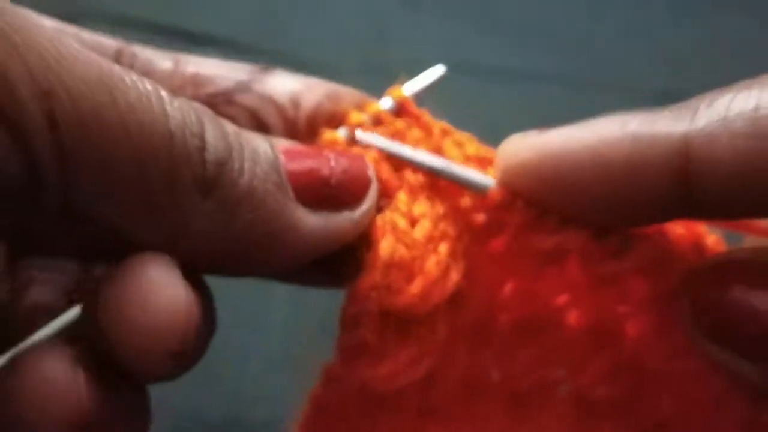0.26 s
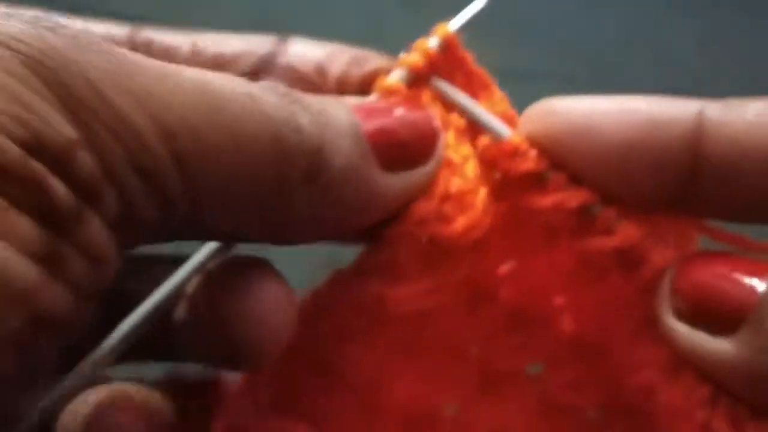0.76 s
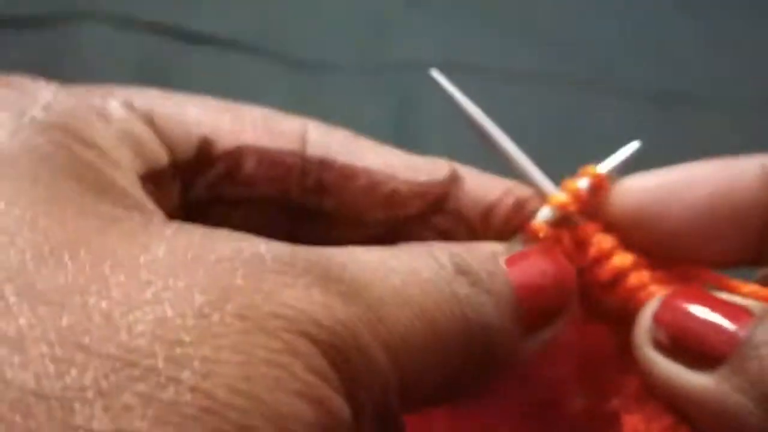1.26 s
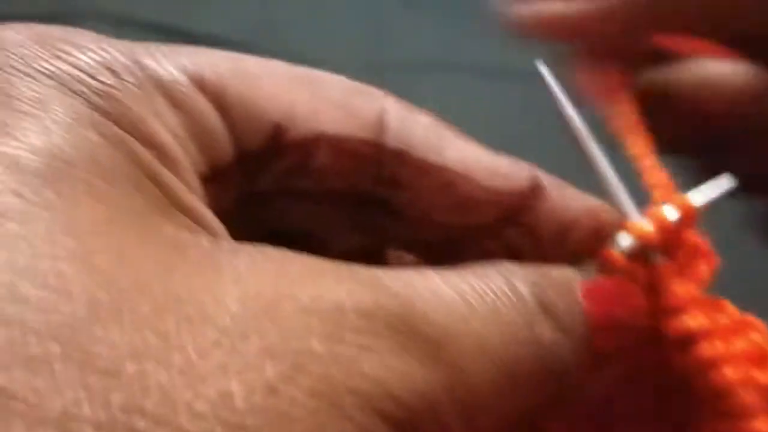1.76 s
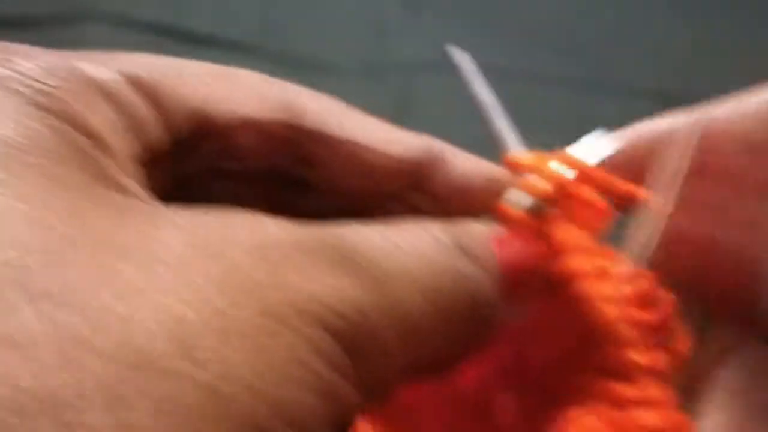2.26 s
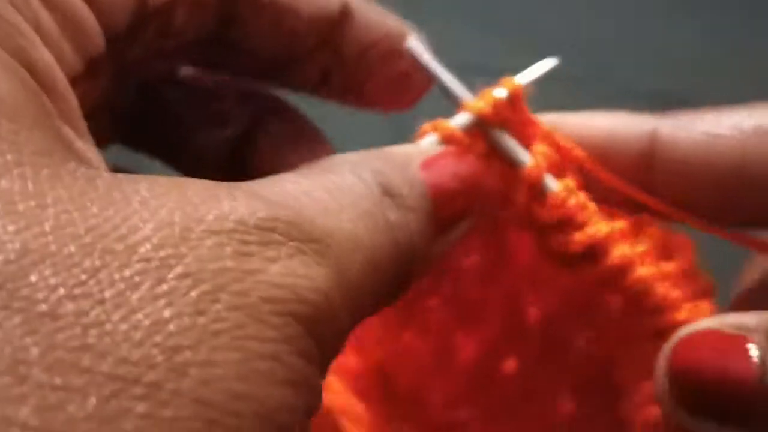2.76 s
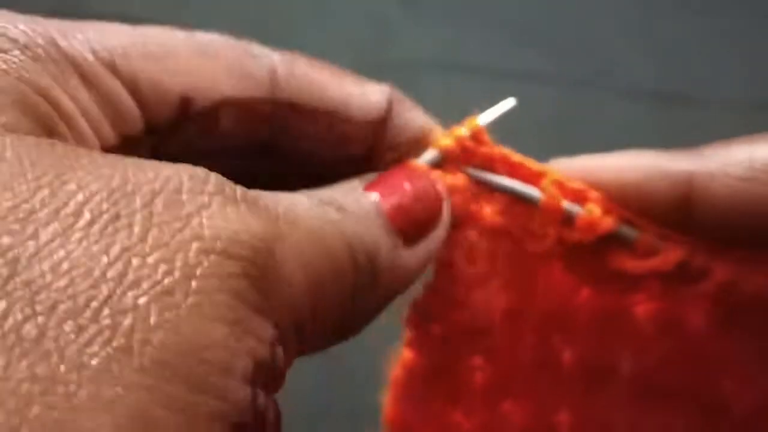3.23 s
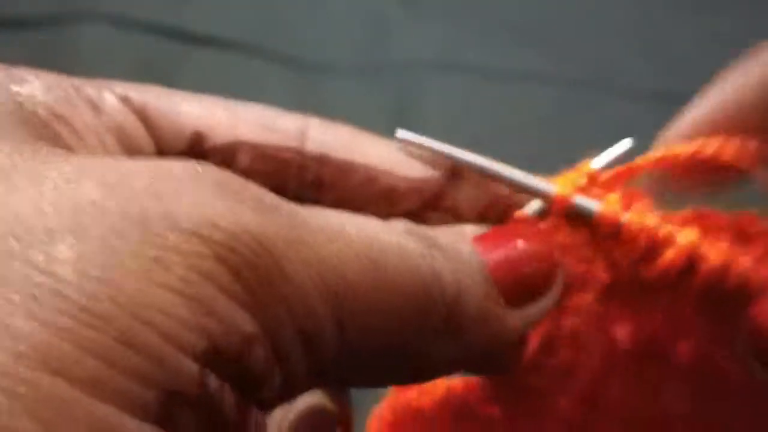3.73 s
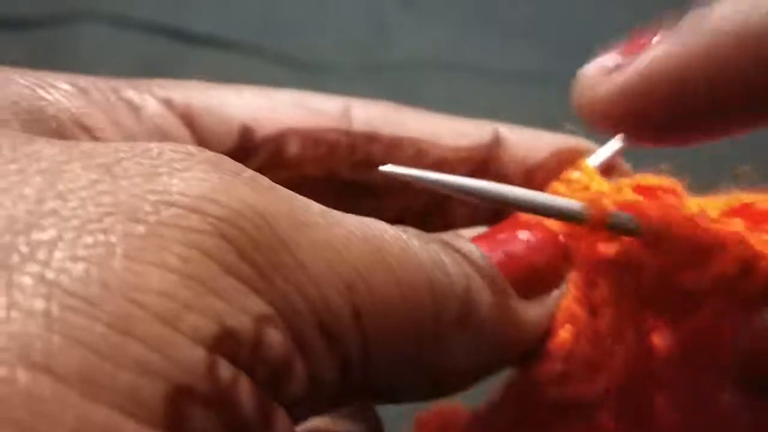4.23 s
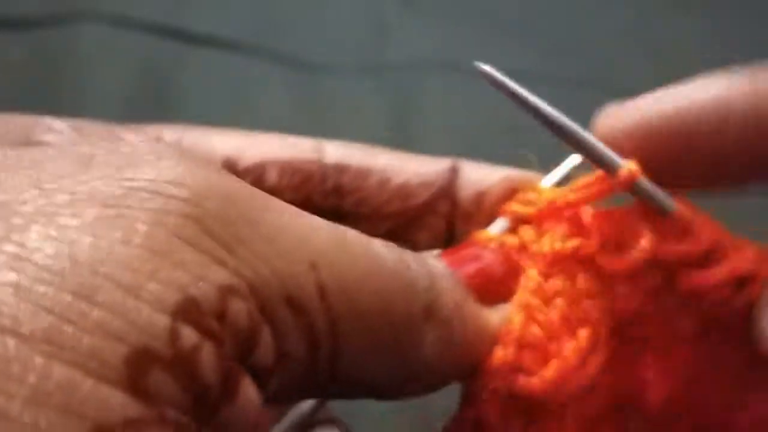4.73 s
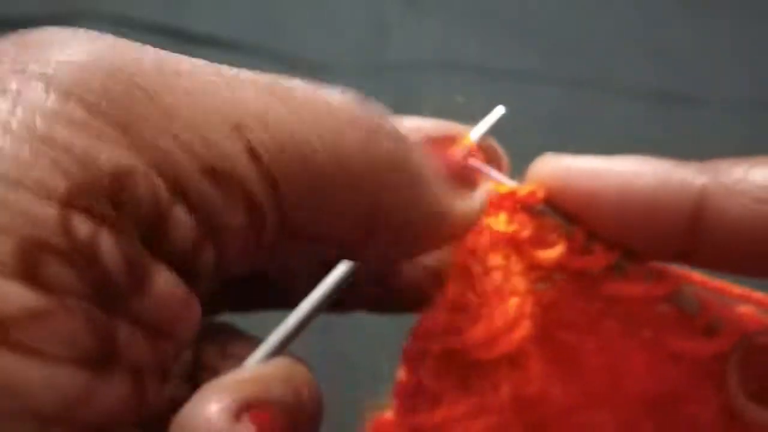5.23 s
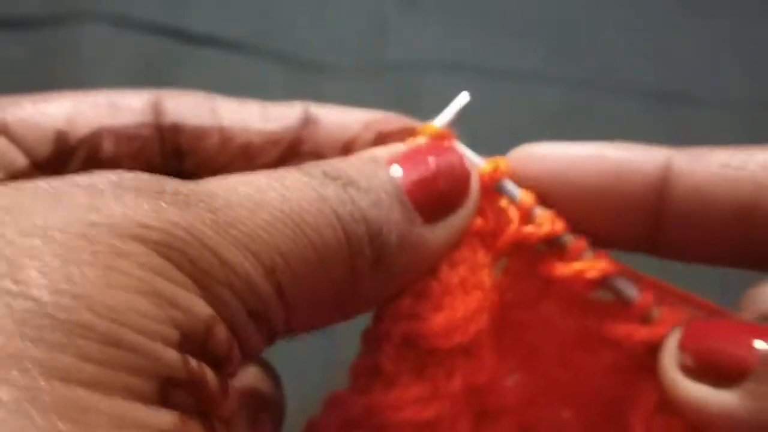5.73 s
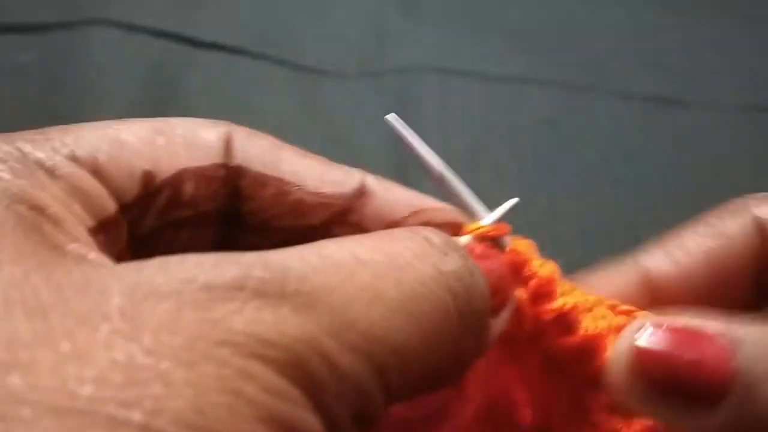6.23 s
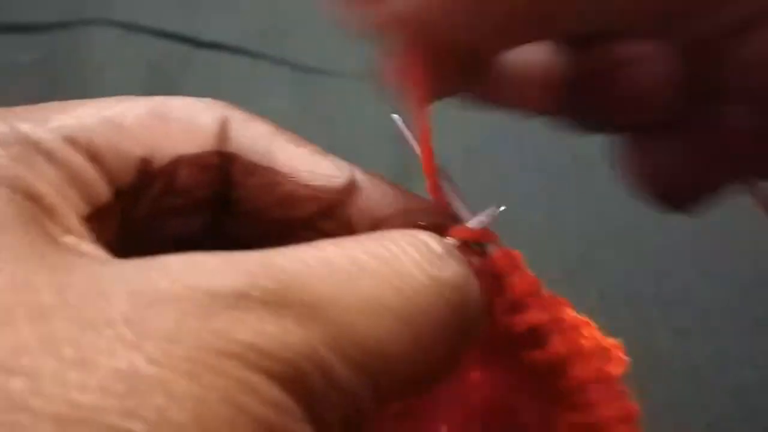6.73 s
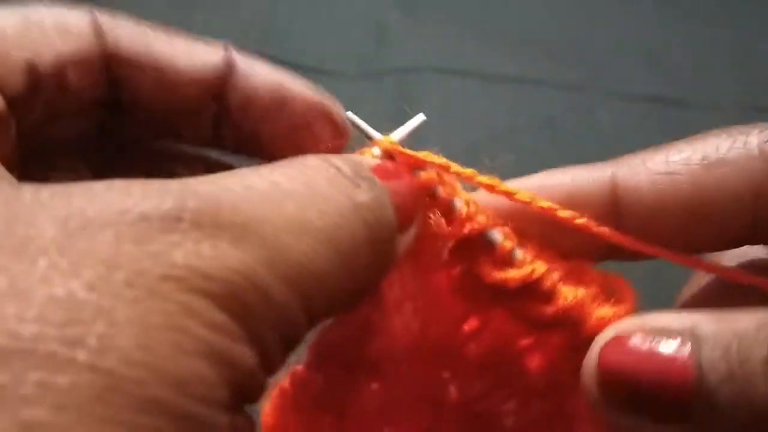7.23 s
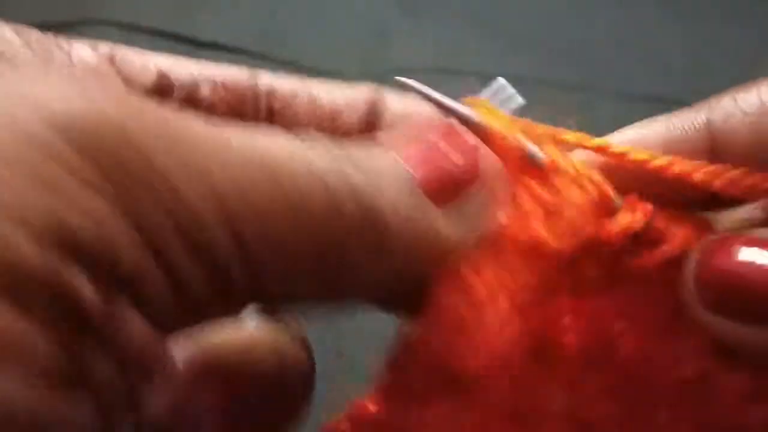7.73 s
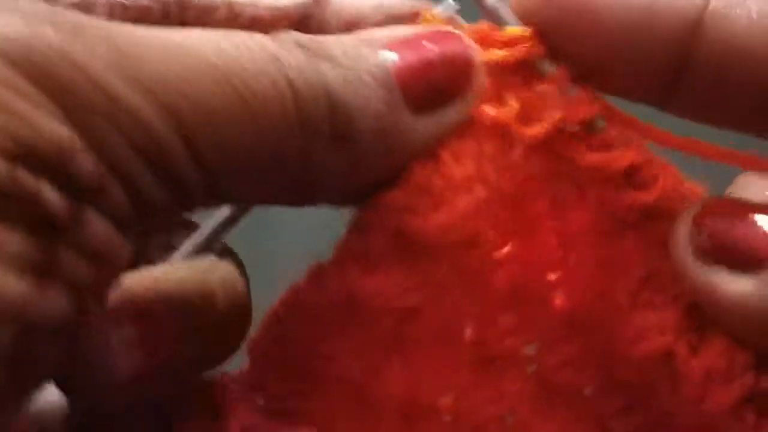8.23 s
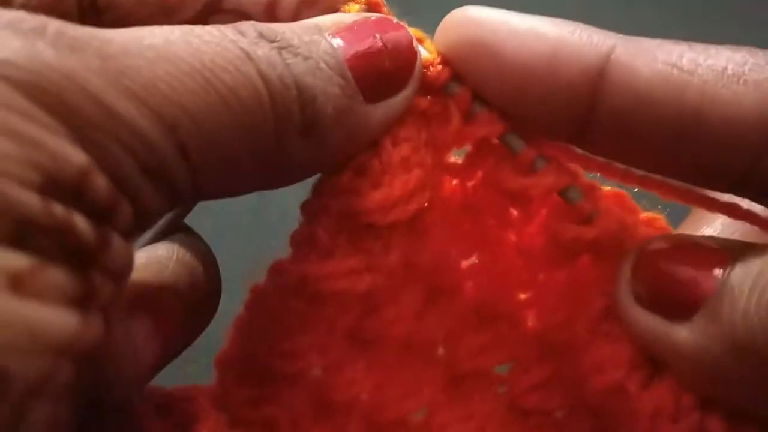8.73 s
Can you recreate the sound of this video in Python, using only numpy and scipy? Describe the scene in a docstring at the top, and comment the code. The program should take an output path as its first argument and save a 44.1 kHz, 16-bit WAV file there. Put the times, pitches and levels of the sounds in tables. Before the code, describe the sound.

Thin metal knitting needles knock sharply and bounce close by, with soft wool rustles and dull handling thumps over a faint steady hiss.

```python
"""Knitting close to two microphones

Hands knit with thin metal needles in a quiet room. Shaped noise gives the hiss of the electronics, the short
swells of wool on skin, and the low rumble and rustle of moving hands. A needle end knocks and bounces on the
housing by the right microphone: contact forces ring dying modes, with noise ticks on top. Softer thumps reach
both microphones through the support as decaying sines; needle scrapes are brief bright noise bursts."""
import sys
import numpy as np
from scipy import signal
from scipy.fft import rfft, irfft
from scipy.io import wavfile
from scipy.ndimage import uniform_filter1d

SR = 44100
rng = np.random.default_rng(int(sys.argv[2]) if len(sys.argv) > 2 else 0)


def output_pcm(signal):
    """Save a mono or channel-first signal as 16-bit PCM at the path in sys.argv[1].

    Samples are clipped to [-1, 1] before scaling.
    """
    pcm = np.clip(np.atleast_2d(signal).T, -1, 1) * 32767
    wavfile.write(sys.argv[1], SR, np.round(pcm).astype(np.int16))


N = 396018

# modes of the housing wall by the right microphone, before the stiffness factor: nominal_hz, level_db, t60_s
WALL_MODES = [(698, .8, .0032), (1886, -8.3, .0028)]


def gain_of(db):
    """Decibels to amplitude gain."""
    return 10 ** (np.asarray(db) / 20)


def read(points, hz):
    """Interpolates (hz, value) points on a logarithmic frequency axis."""
    point_hz, value = np.transpose(points)
    return np.interp(np.log(hz + 1), np.log(point_hz + 1), value)


def sides(pan_db):
    """Left and right gains for a left-right level difference."""
    return gain_of(np.array([pan_db / 2, -pan_db / 2]))


def add(mix, start_s, sound):
    """Mixes a stereo sound in at a time, cut at the end of the mix."""
    part = mix[:, round(start_s * SR):][:, :sound.shape[1]]
    part += sound[:, :part.shape[1]]


def noise(spectrum, likeness, patchy_db, tilt=((0, 0), (9, 0))):
    """Stereo noise of rms 1 with drifting patches; tilt (s, dB per octave) swings the colour about 7.5 kHz."""
    size, hop = 512, 128  # samples
    frames = N // hop + 5
    hz = np.fft.rfftfreq(size, 1 / SR)
    a, b, c, d, patches = rng.standard_normal((frames, len(hz), 5)).T
    patches = uniform_filter1d(patches, size=6, axis=0)
    patches = uniform_filter1d(patches, size=16, axis=1)

    # the right side shares part of the left
    like = np.clip(read(likeness, hz), -1, 1)[:, None]
    left = a + 1j * b
    right = like * left + np.sqrt(1 - like ** 2) * (c + 1j * d)
    bins = np.array([left, right])

    frame_s = np.arange(frames) * hop / SR
    tilt_db = np.interp(frame_s, *np.transpose(tilt)).clip(-5, 5)
    lean_db = np.log2((hz[:, None] + 500) / 8000) * tilt_db
    shape = gain_of(read(spectrum, hz)[:, None] + lean_db)
    bins *= shape / np.sqrt(np.mean(shape ** 2, 0))  # colour at constant power
    bins *= gain_of(patchy_db * patches / patches.std())
    x = signal.istft(bins, nperseg=size, noverlap=size - hop)[1][:, :N]
    return x / x.std()


def swells(rows, rest_db):
    """Stereo gain of movements over a rest level: 10 dB up within each rise, 10 dB down within each fall."""
    t = np.arange(0, N + 64, 64) / SR
    peak_s, db, rise_s, fall_s, pan_db = np.transpose(rows)[:, :, None]
    away = np.where(t < peak_s, (peak_s - t) / rise_s, (t - peak_s) / fall_s)
    gains = gain_of(db - 10 * away) * sides(pan_db)
    power = gain_of(rest_db) ** 2 + (gains ** 2).sum(1)
    return np.sqrt([np.interp(np.arange(N) / SR, t, p) for p in power])


def jerks(shape, rate_hz, decay_s):
    """Random impulses of exponential size, each dying away exponentially."""
    hits = rng.exponential(1, shape) * (rng.random(N) < rate_hz / SR if shape == N
                                        else rng.random(shape) < rate_hz / SR)
    return signal.lfilter([1], [1, -np.exp(-1 / (decay_s * SR))], hits)


def ring(modes, t, factor=1, wave=np.cos):
    """Answer of dying modes to one sharp blow; the factor scales their frequencies."""
    return sum(gain_of(db - 60 * t / t60_s) * wave(2 * np.pi * hz * factor * t) for hz, db, t60_s in modes)


def push(t, peak_ms):
    """Contact force of unit impulse that peaks after peak_ms and then lets go."""
    u = np.maximum(t, 0) * 1000 / peak_ms
    return u * np.exp(-u) * 1000 / (peak_ms * SR)


def electronics_hiss():
    """Steady hiss of the electronics, partly alike at both microphones in the bass."""
    # spectrum: hz, relative_db_per_hz
    hiss_spectrum = [(30, -24), (70, -16), (110, 8), (190, -1), (240, 1), (490, -10), (900, -14),
                     (2770, -14.5), (3900, -15.5), (14000, -13), (15600, -12.5)]
    # left-right likeness: hz, likeness (0 to 1)
    hiss_likeness = [(60, 0.31), (300, 0.35), (700, 0.19), (1500, 0.036), (3000, 0.016)]
    return gain_of(-56) * noise(hiss_spectrum, hiss_likeness, patchy_db=2.5)


def rubbing():
    """Fibres slide in a fine hiss that follows the hands; single fibres snap free as tiny grains."""
    # wool over skin and needle: peak_s, level_db, rise_s, fall_s, left_right_db, tilt_db_per_octave
    strokes = np.array([(.65, -55, 0.2, 0.57, 2.5, -1), (1.13, -43, 0.069, 0.047, -2.5, 1.3),
                        (1.17, -44.5, 0.041, 0.019, -3, -1.7), (1.42, -52.5, 0.072, 0.072, -2, -2.5),
                        (1.47, -49.5, 0.019, 0.086, -1, -2), (1.6, -55, .03, .04, 1, -4.5),
                        (1.69, -50.5, 0.11, 0.043, 3, 0), (2.05, -51.5, 0.035, .07, -2, -1),
                        (2.15, -57, 0.046, 0.12, 1, 0), (2.35, -47, 0.059, 0.017, 2, -3.5),
                        (2.42, -58, .1, .2, -4, -1), (2.78, -55, 0.13, .15, -2, -5.5),
                        (2.92, -40.5, 0.029, 0.034, 1.5, 4.5), (3.33, -56.5, .05, 0.037, -2, -2.5),
                        (3.55, -48.5, 0.051, 0.061, 0, -0.9), (3.67, -47, 0.11, 0.069, -2, -1),
                        (3.88, -54, 0.063, 0.085, 1, 1), (4.05, -61, 0.09, 0.21, -1, -3),
                        (4.38, -57, .11, 0.13, 5, 0), (4.53, -53.5, .1, 0.025, -4, 2),
                        (4.75, -56, 0.12, 0.12, 2, 1), (4.91, -49, .07, 0.065, -4, -1),
                        (5.6, -59.5, .28, .3, 0, -1.5), (5.86, -44.5, 0.066, 0.04, -1, 0.5),
                        (6.03, -57, 0.033, .08, -3, -3), (6.1, -48.5, 0.018, 0.046, -2, -6),
                        (6.22, -52.5, 0.062, .1, -5, -2.5), (6.42, -50, 0.17, 0.053, 2, -2),
                        (6.9, -53, .05, 0.024, 1.5, 0.5), (7.1, -50, .05, 0.045, -1, -2),
                        (7.23, -59.5, .07, .15, -2, -1.5), (7.35, -51, 0.041, 0.035, -2, -1.5),
                        (7.62, -60, .3, .05, -3, -5), (7.76, -46.5, 0.066, 0.093, -2.5, -1),
                        (8.15, -55.5, 0.34, .12, 1, -2.5), (8.28, -50.5, 0.065, 0.086, -3, -2.7),
                        (8.78, -55, 0.15, 0.17, 0, 1.5), (8.93, -47, 0.028, .1, -2, -2.5),
                        (8.98, -42.5, 0.044, .1, -7, 3)])
    # spectrum: hz, relative_db_per_hz
    wool_spectrum = [(500, -11.5), (1500, -11.5), (4500, -6.5), (6500, -4), (9000, -0.5), (13500, -0.5),
                     (16000, -5.5)]
    fibres = noise(wool_spectrum, [(1, 0.026)], patchy_db=3.5, tilt=strokes[:, [0, 5]])
    grain = 1 + 0.21 * jerks((2, N), rate_hz=260, decay_s=0.0014)
    return swells(strokes[:, :5], rest_db=-66.5) * grain * fibres


def handling():
    """Hand shifts carried by the support: a lumpy shared rumble and a duller, crumbly rustle at each side."""
    # shifts: peak_s, rumble_db, rustle_db, rise_s, fall_s, rustle_left_right_db
    shifts = [(.27, -62, -70, .1, .15, 0), (.63, -58.5, -57, .3, 0.29, 1.5),
              (1.11, -54.5, -55.5, 0.12, 0.028, -1), (1.205, -49, -54, .01, .012, -9),
              (1.23, -51, -66, .03, .04, -9), (1.41, -57, -63, 0.16, .1, 2),
              (1.45, -46, -60, 0.027, 0.0076, -11), (1.505, -47, -53, .015, 0.014, -2),
              (1.6, -55, -52.5, 0.019, 0.027, 4), (1.67, -51, -50.5, 0.072, 0.061, 3.5),
              (1.76, -57, -55, 0.034, .05, 4), (1.82, -48.5, -59, 0.18, 0.067, 0),
              (1.92, -57, -56.5, .03, 0.07, 1), (2.03, -47, -51, .06, 0.065, 1),
              (2.22, -55, -67, .05, 0.06, -8), (2.35, -50, -54.5, 0.19, 0.09, 3.5),
              (2.5, -37, -54, 0.013, 0.04, -7), (2.547, -58, -50.5, .02, 0.009, -8),
              (2.56, -54, -49.5, .004, 0.019, -9), (2.7, -45.5, -56, 0.073, 0.07, 5),
              (2.95, -69, -60, 0.4, 0.084, -2), (3.23, -65, -65.5, 0.23, .3, -3),
              (3.6, -60, -64.5, 0.23, 0.12, -10), (3.93, -69, -59.5, 0.15, 0.042, -5),
              (4.53, -55.5, -58.5, 0.26, 0.05, -2.5), (4.69, -50, -61.5, 0.072, 0.21, -2),
              (4.95, -59, -66, 0.23, 1, -6), (5.55, -62.5, -70, 0.23, 0.13, 2),
              (5.85, -53, -61, 0.13, 0.022, -9), (6.1, -45.5, -58, 0.027, .1, -5),
              (6.225, -39, -51, .025, 0.038, 2), (6.3, -60, -56.5, .05, .06, 1),
              (6.38, -45.5, -56, .08, 0.018, 1), (6.612, -43.5, -49.5, 0.073, 0.027, -1.5),
              (6.68, -48.5, -54.5, .025, 0.16, 2.5), (7.1, -50, -57, .1, 0.048, -1),
              (7.55, -59.5, -75, 0.075, 0.55, -4), (8.1, -74, -63.5, 0.27, 0.29, -7.5),
              (8.4, -63, -67, 0.084, 0.18, 3), (8.8, -61, -61.5, .2, 0.11, 3),
              (8.98, -47.5, -53.5, 0.073, .1, 4)]
    # spectrum: hz, relative_db_per_hz
    rumble_spectrum = [(40, -34), (110, -13), (180, 5.5), (240, 2.5), (350, -6.5), (450, -22), (700, -24),
                       (1500, -37)]
    # spectrum: hz, relative_db_per_hz
    rustle_spectrum = [(200, -7), (500, 7), (1000, 3.5), (1600, 0.5), (2500, -1.5), (5000, -4.5),
                       (10000, -13)]
    peak_s, rumble_db, rustle_db, rise_s, fall_s, pan_db = np.transpose(shifts)
    rumble = noise(rumble_spectrum, [(1, 0.81)], patchy_db=2.5)
    rustle = noise(rustle_spectrum, [(1, 0.016)], patchy_db=0.5)
    crumbs = 1 + 0.49 * jerks(N, rate_hz=60, decay_s=0.0017)  # the yarn slips in small jerks
    rumble_gain = swells(np.c_[peak_s, rumble_db, rise_s, fall_s, 0 * peak_s], rest_db=-70)
    rustle_gain = swells(np.c_[peak_s, rustle_db, rise_s, fall_s, pan_db], rest_db=-69.5)
    return rumble_gain * rumble + rustle_gain * crumbs * rustle


def blows(start_s, db, contact_ms, stiff, gap_ms, drop_db, bounce_ms, touch_db):
    """A knock and two slacker bounces, the last sooner and weaker: start_s, then the settings of knock()."""
    bounce = bounce_ms, stiff * 0.87, 2.5, touch_db
    last_gap, last_drop_db = 0.68, -14  # against the first bounce
    return [(start_s, db, contact_ms, stiff, 2.24, 3.9),
            (start_s + gap_ms / 1000, db + drop_db, *bounce),
            (start_s + gap_ms * (1 + last_gap) / 1000, db + drop_db + last_drop_db, *bounce)]


def knock(db, contact_ms, stiff, rebound_ms, rebound_db):
    """A hard contact and a softer rebound ring the near wall; the frame carries a dull, late swing far over."""
    # support under the right microphone: hz, level_db, t60_s
    support_modes = [(215, -25, .06)]
    # frame at the left microphone: hz, level_db, t60_s
    frame_modes = [(211, -32, .052), (484, -30, .022), (879, -28, .006)]
    rebound_contact_ms, frame_lag_s = 0.48, 0.0013
    t = np.arange(3000) / SR
    since_rebound_s = t - rebound_ms / 1000
    first = push(t, contact_ms)
    force = first + gain_of(rebound_db) * push(since_rebound_s, rebound_contact_ms)
    near = signal.fftconvolve(force, ring(WALL_MODES, t, stiff) + ring(support_modes, t))[:len(t)]

    # loose parts of the housing buzz on for a moment
    buzz = rng.standard_normal(len(t)) * np.exp(-t / 0.0029) * (1 - np.exp(-t / 0.00065))
    near += gain_of(-21.5) * signal.lfilter(*signal.butter(2, [500, 2200], "band", fs=SR), buzz)

    late = np.maximum(t - frame_lag_s, 0)
    far = -signal.fftconvolve(first, ring(frame_modes, late, wave=np.sin))[:len(t)]

    # the metal ticks at both contacts
    second = np.exp(-abs(since_rebound_s - 0.6 * rebound_contact_ms / 1000) / 0.0002)
    grit = (np.exp(-t / 0.0005) + 0.12 * second) * rng.standard_normal(len(t))
    tick = signal.lfilter(*signal.butter(2, [1800, 5200], "band", fs=SR), grit)
    tick /= abs(tick).max()
    # the tick grows faster than the blow, and longer contacts tick less
    tick_db = 2.2 * db - 19 - 31.5 * contact_ms
    return gain_of(db) * np.array([far, near]) + gain_of(tick_db) * tick * [[0.06], [1]]


def scrape(db, pan_db, rise_s, fall_s, tilt_db):
    """Needle on needle: brief friction noise that catches fast and breaks off, independent at each side."""
    t = np.arange(4096) / SR
    hz = np.fft.rfftfreq(len(t), 1 / SR)
    colour = gain_of(tilt_db * np.log2((hz + 700) / 8000))
    burst = irfft(rfft(rng.standard_normal((2, len(t)))) * colour)
    shape = np.where(t < rise_s, np.sqrt(t / rise_s), np.exp(-(t - rise_s) / fall_s))
    return gain_of(db) * sides(pan_db)[:, None] * burst * shape


def thump(db, pan_db, hz, held_s, slap_db):
    """The support swings while a soft blow lasts, then dies away; the first touch slaps the housing wall."""
    t60_s = 0.028
    t = np.arange(5000) / SR
    decay = gain_of(-60 * np.maximum(t - held_s, 0) / t60_s)
    swing = np.sin(2 * np.pi * hz * t) * decay * (1 - np.exp(-t / 0.00028))
    slap = signal.fftconvolve(push(t - 0.0012, 0.42), ring(WALL_MODES, t))[:len(t)]
    both = 0.78 * swing + gain_of(slap_db) * slap / slap.max()
    return gain_of(db) * sides(pan_db)[:, None] * both


def scene():
    """Hiss, rubbing and handling, with every blow and scrape in its place."""
    # start_s, blow_db, contact_ms, stiffness_factor, bounce_after_ms, bounce_db (against the blow),
    # bounce_contact_ms, bounce_second_touch_db (against its first)
    knocks = [(1.18, 3.8, .14, 1.5, 9.2, -6, .17, -3), (1.2598, -6.1, .15, 1.13, 11, -4, .36, 1.5),
              (1.4748, 2.3, .14, 1.32, 8.7, -5, .17, -6), (2.1976, -3.9, .17, 1.12, 7.4, -6.5, .29, 3.5),
              (2.5154, -.9, .13, 1.26, 7, -5, .23, 5), (6.3441, -4, .28, .95, 7.7, -1, .45, -2.5),
              (6.609, -5, .3, 1.05, 8.2, -12.5, .28, -1), (6.9877, -2.8, .21, 1.09, 7.7, -8.5, .28, -1)]
    # start_s, level_db, left_right_db, rise_s, fall_s, tilt_db_per_octave
    scrapes = [(1.427, -40.5, 3, 0.0046, 0.0059, 0.5), (2.335, -47, 5, 0.0026, .006, 2),
               (2.384, -47.5, 3, 0.0043, 0.034, -2.5), (2.4862, -29, 7, 0.00037, 0.0023, -2),
               (2.741, -39, 3, 0.015, 0.0017, -3), (3.321, -48, -1.5, 0.0022, .006, 1),
               (3.874, -46.5, -6, 0.0052, 0.013, 6.5), (4.864, -51, -7, .003, 0.0097, -2),
               (6.094, -39, -2, 0.0017, 0.0023, 0), (6.341, -47.5, 7, 0.0044, 0.0064, -7),
               (7.091, -47.5, 6, 0.0033, .006, -1), (7.565, -40.5, -3, 0.0016, 0.0017, 3.5),
               (7.601, -47, -3, .002, 0.029, 2.5), (8.9155, -38, 1, 0.00035, 0.00096, 5.5)]
    # start_s, level_db, left_right_db, ring_hz, held_s, slap_db (against level_db)
    thumps = [(1.428, -30.5, 2, 264, 0.005, -18), (1.595, -45, 3, 230, .0063, 1),
              (1.64, -43.5, 1, 210, 0.018, -9), (1.671, -41, 4, 333, .008, 0),
              (1.906, -46.5, 4, 250, 0.0092, -3), (2.005, -44, 2, 350, .008, 0),
              (2.39, -37, 0, 214, 0.0082, -3), (2.488, -29, 3, 330, 0.0034, -3),
              (2.678, -39.5, 4, 247, 0.01, -12), (2.752, -34.5, -2, 373, .0049, -6),
              (3.875, -48.5, -3, 285, 0.0082, 2), (4.508, -49, -4, 205, 0.014, 7),
              (4.67, -41, -5, 225, 0.0043, -3), (4.867, -35, -2.5, 225, 0.0021, -11),
              (6.075, -38, -1.5, 305, .008, -7), (6.085, -41, -10, 219, 0.005, 5),
              (6.093, -23.5, -3, 218, 0.0077, -1.5), (6.108, -39, -12, 237, 0.004, 2),
              (6.128, -37.5, -1, 227, 0.012, -20), (6.188, -40.5, -10, 224, 0.0046, 3),
              (6.213, -37.5, -2, 200, 0.0051, -18), (6.231, -26.5, 5.5, 185, 0.0059, -2.5),
              (6.543, -45, 4, 270, 0.0088, -6), (6.776, -47, 1, 235, 0.014, -8),
              (7.099, -37, 2, 215, 0.014, -13), (7.613, -43.5, -4, 212, 0.01, -0.5),
              (7.748, -43.5, -3, 188, .008, -16), (8.267, -48, -4, 208, 0.033, -10)]
    mix = electronics_hiss() + rubbing() + handling()
    contacts = [blow for row in knocks for blow in blows(*row)]
    for table, source in ((contacts, knock), (scrapes, scrape), (thumps, thump)):
        for start_s, *settings in table:
            add(mix, start_s, source(*settings))
    return mix


def record(dry):
    """The steep bass cut of the microphones, which lets a trace of deep bass through, then the band limit."""
    thin = signal.sosfilt(signal.butter(5, 210, "high", fs=SR, output="sos"), dry)
    thin += gain_of(-25) * signal.lfilter(*signal.butter(1, [45, 110], "band", fs=SR), dry)
    band_limit = signal.firwin(511, 15750, window=("kaiser", 9), fs=SR)
    return signal.oaconvolve(thin, band_limit[None], "same")


dry = scene()
out = record(dry)
output_pcm(out)
```